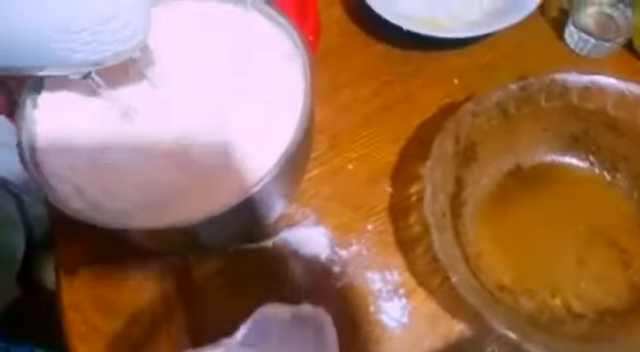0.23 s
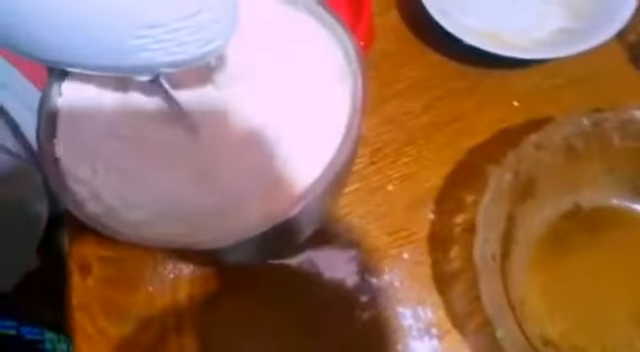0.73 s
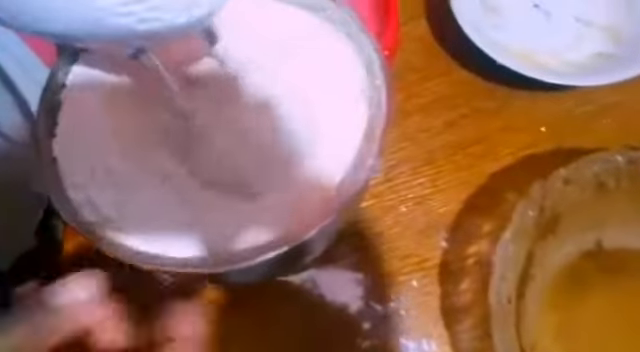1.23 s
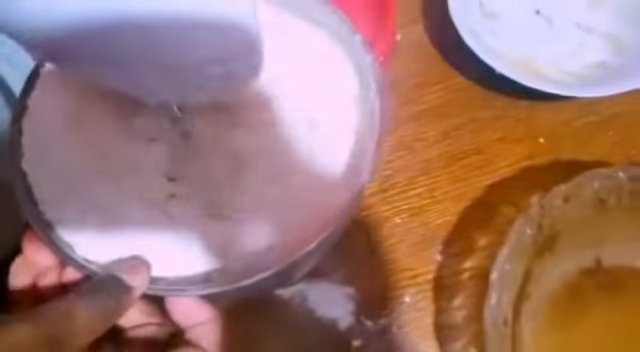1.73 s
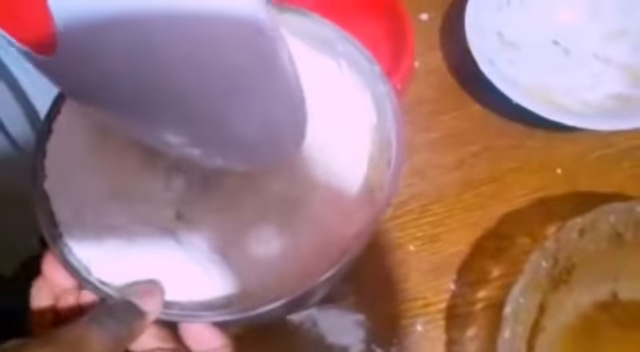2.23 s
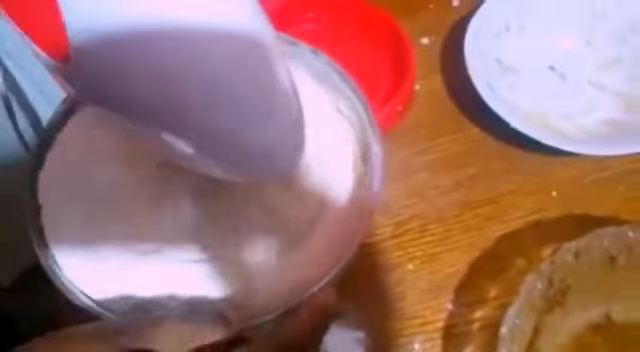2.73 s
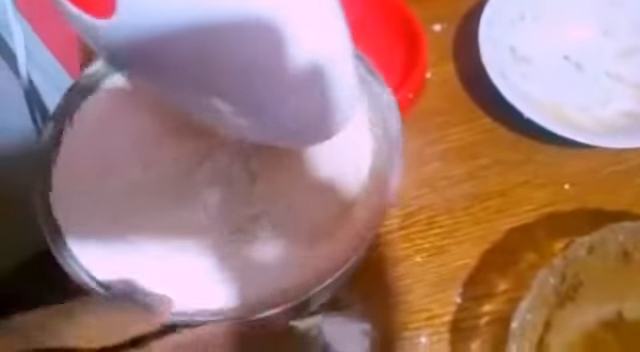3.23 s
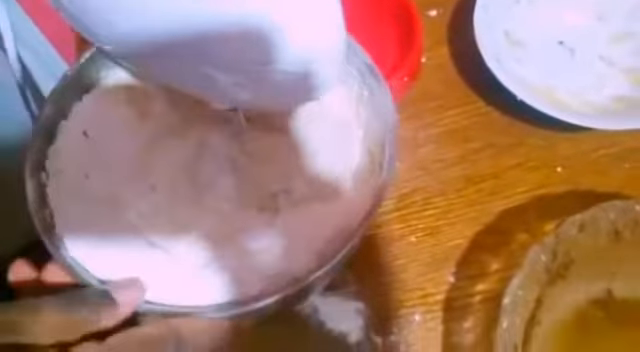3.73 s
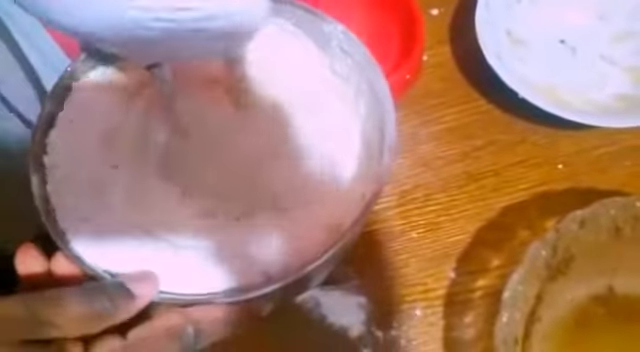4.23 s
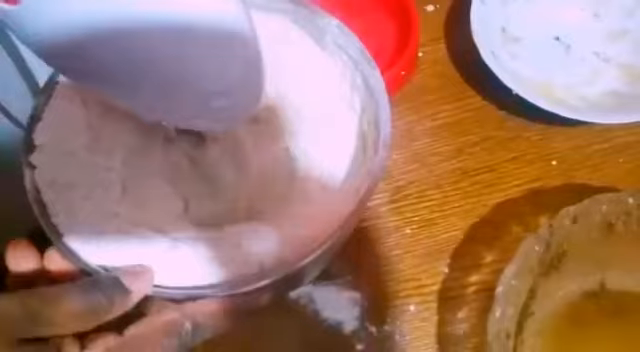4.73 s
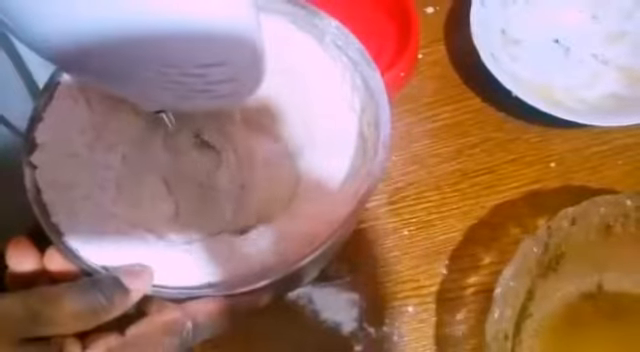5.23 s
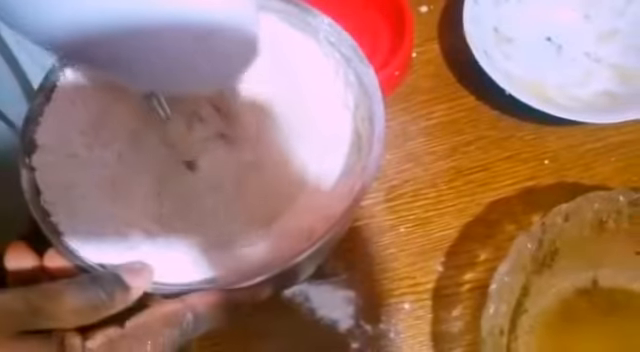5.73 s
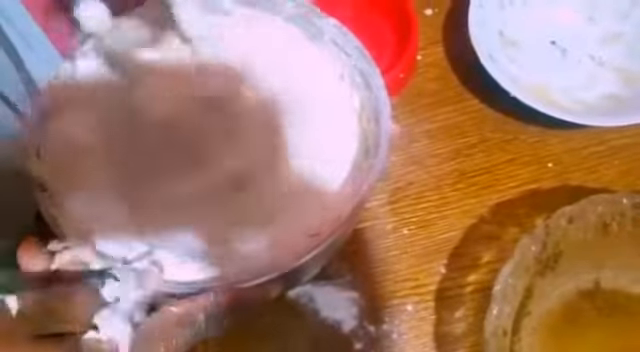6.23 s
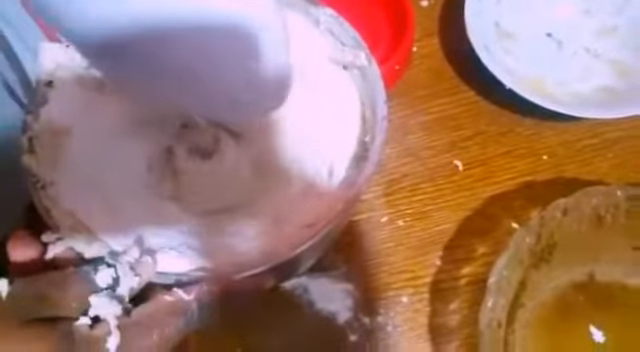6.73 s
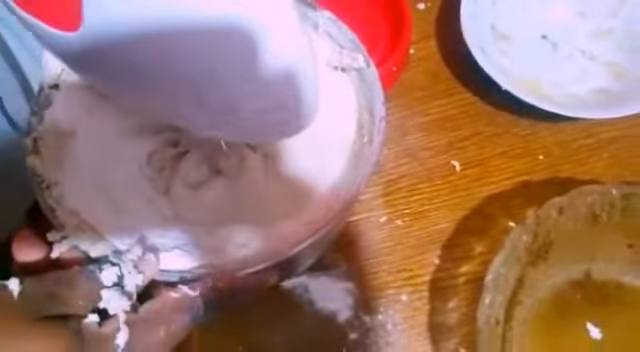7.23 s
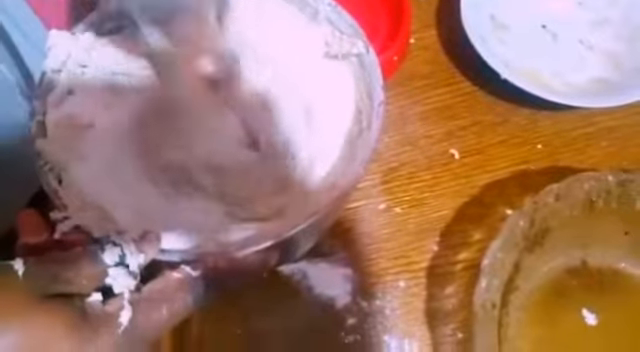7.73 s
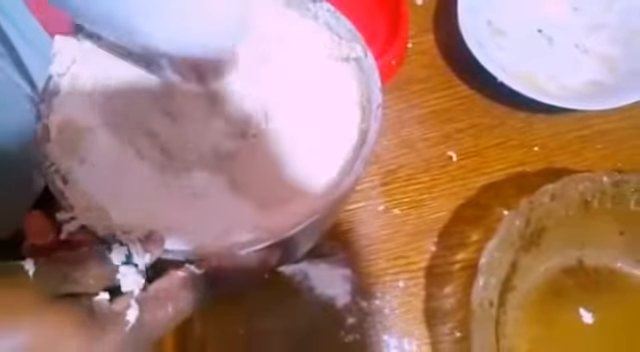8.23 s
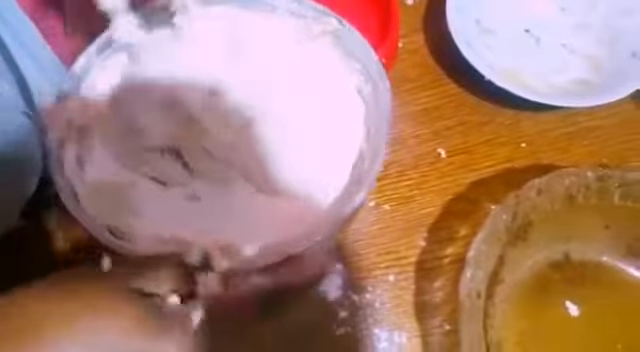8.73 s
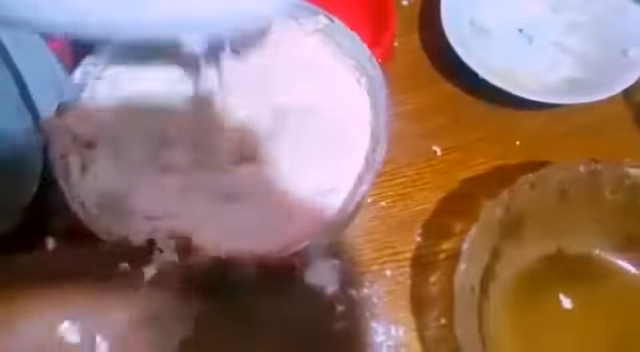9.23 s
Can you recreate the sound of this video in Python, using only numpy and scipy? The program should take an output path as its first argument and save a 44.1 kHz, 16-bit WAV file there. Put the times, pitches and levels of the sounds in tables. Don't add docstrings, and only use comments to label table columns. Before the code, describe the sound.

Close up in a kitchen, a hand mixer whirs and buzzes through stiff batter, stops with a sharp click, then beaters knock and drag in the bowl.

```python
import sys
import numpy as np
from scipy import signal
from scipy.fft import rfft, irfft
from scipy.io import wavfile
from scipy.ndimage import uniform_filter1d

SR = 44100
rng = np.random.default_rng(int(sys.argv[2]) if len(sys.argv) > 2 else 0)


def to_wav(sig):
    pcm = np.clip(np.atleast_2d(sig), -1, 1) * 32767
    pcm = np.round(pcm).astype(np.int16)
    wavfile.write(sys.argv[1], SR, pcm.T)


def nominal_scale(level):
    x = np.asarray(level, float) / 20
    return 10 ** x


N = 417627

MAINS_THROB_HZ, SLOTS, SWITCH_OFF_S = 100, 12, 7.1
# time in seconds, churning level in dB.
EFFORT = [(.19, -27), (.32, -39), (.57, -39.5), (1.08, -30), (1.35, -27.5), (1.86, -30.5), (2.6, -23.5),
          (2.9, -26), (3.4, -25), (3.75, -27.5), (4.25, -26.5), (4.42, -22), (4.79, -29), (5.04, -26),
          (5.5, -32.5), (6.3, -23), (6.73, -29), (7.0, -28.5)]
# centre in Hz, width in Hz, level in dB.
SHELL = [
    (930, 7.9, 31.5),
    (2860.8, 61.6, 33),
]


def rms_one(x):
    return x / np.sqrt(np.mean(x ** 2) + 1e-20)


def in_time(rows):
    s, *columns = np.transpose(rows)
    return [np.interp(np.arange(N) / SR, s, c) for c in columns]


def between(t0, t1, fade=0.00067):
    t = np.arange(N) / SR
    return np.clip(np.minimum(t - t0, t1 - t) / fade, 0, 1)


def at_hz(points, hz):
    point_hz, db = np.transpose(points)
    return np.interp(np.log(hz), np.log(point_hz), db)


def drift(rate):
    r = np.exp(-80 * np.pi * rate / SR)
    slow = signal.lfilter([1], [1, -2 * r, r * r], rng.standard_normal(N // 40 + 2002))[2000:]
    return np.interp(np.arange(N) / 40, np.arange(len(slow)), rms_one(slow))


def swells(rows, column=3):
    t = np.arange(0, N + 64, 64) / SR
    power = 0
    for row in rows:
        rising = (row[0] - t) / max(row[1], .003)
        falling = (t - row[0]) / max(row[2], .003)
        power = power + nominal_scale(2 * (row[column] - 20 * np.maximum(rising, falling)))
    return np.interp(np.arange(N) / SR, t, 10 * np.log10(power + 1e-12))


def ring(force, hz, t60):
    r, w = nominal_scale(-60 / (t60 * SR)), 2 * np.pi * hz / SR
    return signal.lfilter([0, np.sin(w)], [1, -2 * r * np.cos(w), r * r], force + 1e-18)


def port_noise(spectrum, patchy_db, grain_db):
    # frequency in Hz, likeness of the two ports.
    likeness = [(40, .3), (90, 1), (200, 0.99), (450, 0.41), (700, 0.93), (1200, 0.42), (3000, 0),
                (10000, 0.12)]
    # frequency in Hz, how much louder the left port is in dB.
    near_port = [(60, 2), (140, -3), (300, -1), (1000, 0), (3000, 3.5), (6000, -2.5), (12000, -5)]
    port_lag = 3.58
    hz = np.maximum(np.fft.rfftfreq(N + 1, 1 / SR), 10)
    grains = nominal_scale(grain_db * np.minimum(rng.exponential(1, N + 1), 5))
    mid, side = rfft(rng.standard_normal((2, N + 1)) * grains) * nominal_scale(at_hz(spectrum, hz))
    alike = np.clip(at_hz(likeness, hz), -1, 1)
    ports = np.sqrt(1 + alike) * mid + np.sqrt(1 - alike) * side * [[1], [-1]]
    ports = ports * nominal_scale(at_hz(near_port, hz) / 2 * [[1], [-1]])
    ports = ports * np.exp(-2j * np.pi * hz * port_lag / SR * [[0], [1]])
    return rms_one(irfft(ports, N + 1)[:, :N]) * nominal_scale(patchy_db * drift(8.3))


def at_ports(line, phase, near_db=2):
    near = line * nominal_scale(near_db / 2)
    far = line * np.exp(1j * phase) * nominal_scale(-near_db / 2)
    return np.sqrt(2) * np.real([near, far])


def room_air():
    # frequency in Hz, level in dB per Hz.
    air = [(40, -33), (75, 13.5), (110, -3), (170, 2.5), (400, -8), (2000, -24), (8000, -28.5),
           (14000, -48.5)]
    return nominal_scale(-49) * port_noise(air, patchy_db=1, grain_db=0)


def far_drone():
    # frequency in Hz, level in dB per Hz.
    colour = [(30, -22), (55, 1.5), (100, 3), (140, -50)]
    # peak time in seconds, rise in seconds, fall in seconds, level in dB.
    visits = [(2.3, .4, 0.34, -50), (3.5, 0.14, 1.5, -43), (5.25, 0.37, 0.55, -36),
              (7.0, 0.85, 0.44, -41.5), (7.85, 0.32, 0.43, -62.5), (8.9, 0.58, 1.1, -39.5),
              (9.35, 0.42, 0.45, -48)]
    return nominal_scale(swells(visits)) * port_noise(colour, patchy_db=8.5, grain_db=-12.5)


def bowl_ring(force):
    # frequency in Hz, level in dB, t60 in seconds.
    modes = [(383, -7, 0.057), (671, -2, 0.087), (753, 1, 0.06), (884, 4, 0.04), (960, -5.5, 0.058),
             (1120, -6.5, 0.048), (1302, -8.5, 0.05), (1500, -14, 0.042), (2076, -11.5, 0.052),
             (2920, -21.5, 0.042)]
    out = 0
    for hz, db, t60 in modes:
        port_db = rng.normal(0, 1.5, (2, 1))
        out = out + nominal_scale(db + port_db) * ring(force * rng.normal(1, 0.63, N), hz, t60)
    return out


def contacts():
    # time in seconds, peak in dB, bowl ring against tick in dB.
    ticks = [(0.1456, -16.5, -2), (0.273, -21.5, 4), (0.296, -24, 12), (0.314, -34, 11), (0.3636, -33, 16),
             (0.4415, -27, -4), (0.539, -32, -6), (1.513, -34, 26.5), (3.995, -30, -13), (4.6014, -31, -19),
             (5.205, -18, -5), (5.3106, -20.5, 5.5), (5.469, -20.5, 4), (5.588, -28, 21.5),
             (5.6017, -16.5, -4), (7.1248, -9.5, -22), (7.755, -63, 15.5), (7.8054, -58, 18),
             (7.8247, -64.5, 11.5), (7.843, -56, 14), (7.906, -48.5, 20), (7.955, -51.5, 21),
             (7.985, -49, 16), (8.013, -49, 15), (8.0803, -48, 21), (8.18, -52, -7), (8.236, -41.5, -6),
             (8.4252, -48, -6), (8.363, -42, 0), (8.844, -56, 15), (8.89, -63, 14), (9.058, -52, 30),
             (9.4435, -45, 11)]
    # time in seconds, peak in dB, tick against ring in dB.
    knocks = [(7.57, -28.5, -35), (7.61, -29.5, -37.5), (8.212, -38, -25), (8.283, -15.5, -27),
              (8.289, -23, -27.5), (8.292, -41, -30), (8.309, -20.5, -32), (8.325, -25, -31),
              (8.349, -27, -24), (8.358, -25, -22), (8.38, -35, -28), (8.411, -35, -28), (9.088, -17, -35),
              (9.095, -30, -37), (9.121, -18.5, -19), (9.127, -22, -26), (9.136, -30, -20),
              (9.147, -27, -22), (9.163, -26, -29), (9.183, -26, -28), (9.2, -30, -25), (9.225, -31.5, -25),
              (9.307, -52, -35), (9.319, -37, -24), (9.34, -38, -26), (9.402, -33, -30)]
    # frequency in Hz, level in dB per Hz.
    crack_colour = [(150, -15.5), (600, 0.5), (1500, -0.5), (3700, -2), (6000, -4), (10000, -14),
                    (14000, -17.5)]
    contact_s, first_touch = 0.013, 1.4
    hits = [(s, peak, peak + ring_db) for s, peak, ring_db in ticks]
    hits += [(s, peak + tick_db, peak + 9) for s, peak, tick_db in knocks]
    crack, blow = np.zeros(N), np.zeros(N)
    for s, tick_db, ring_db in hits:
        crack[round(s * SR)] = nominal_scale(tick_db + 3.5)
        blow[round(s * SR)] = nominal_scale(ring_db - 38.0)
    fade = signal.lfilter([1], [1, -nominal_scale(-60 / (.014 * SR))], crack + 1e-18)
    fade = uniform_filter1d(fade, size=61, origin=30)
    contact = signal.lfilter([1], [1, -nominal_scale(-60 / (contact_s * SR))], blow + 1e-18)
    blow = first_touch * blow + contact * rng.standard_normal(N)
    steel = nominal_scale(-10) * ring(crack, hz=3750, t60=0.01) * nominal_scale([[2], [-2]])
    return fade * port_noise(crack_colour, patchy_db=1, grain_db=0) + steel + bowl_ring(blow)


def kitchen(x, t60=0.045):
    t = np.arange(SR // 2) / SR
    tail = rng.standard_normal((2, len(t))) * nominal_scale(-60 * t / t60) * (t > .004)
    return signal.fftconvolve(x, tail / np.sqrt(np.sum(tail ** 2) / 2), axes=1)[:, :N]


def rotor_speed():
    # time in seconds, turns per second.
    allowed_speed = [(0, 206), (.8, 208), (1.01, 210.5), (1.33, 241.3), (1.56, 243.5), (1.78, 229.4),
                     (2.3, 222.8), (2.55, 223.6), (2.85, 227.5), (3.05, 226.2), (3.3, 228), (3.5, 226.6),
                     (3.66, 227.3), (4.02, 236), (4.28, 266.5), (4.44, 264), (4.65, 242.6), (5.22, 241.1),
                     (5.6, 225.2), (5.83, 222.3), (5.97, 233.5), (6.12, 243), (6.32, 262), (6.68, 230),
                     (6.9, 224.8), (7.12, 222.5)]
    spin_from_s, spin_up_s, inertia_s = .125, .155, .16
    allowed = uniform_filter1d(in_time(allowed_speed)[0], size=int(inertia_s * SR), mode="nearest")
    return allowed * np.clip(1 - np.exp((spin_from_s - np.arange(N) / SR) / spin_up_s), .13, 1)


def follower(base_db, share, power):
    usual_effort_db, usual_speed = -29, 230
    effort_db = share * (in_time(EFFORT)[0] - usual_effort_db)
    return base_db + effort_db + 20 * power * np.log10(rotor_speed() / usual_speed)


def start_surge(turn, mains):
    # time in seconds, level in dB.
    inrush = [(.147, -48), (.165, -53), (.178, -40), (.186, -40), (.193, -32.5), (.201, -22.5),
              (.212, -30.5), (.225, -35.5), (.25, -34.5), (.3, -53), (.45, -52.5), (.6, -49)]
    lag_s = .0015
    throb = 1 + .9 * np.cos(mains - 2 * np.pi * MAINS_THROB_HZ * lag_s)
    tones = sum(nominal_scale(db) * np.sin((k + 1) * SLOTS * turn) for k, db in enumerate([0, -17, -34]))
    sparks = nominal_scale(-13) * rng.standard_normal(N)
    force = nominal_scale(in_time(inrush)[0]) * (tones + sparks) * throb * between(.147, .6)
    rings = 0
    for hz, width, db in SHELL:
        rings = rings + nominal_scale(db) * 2 * np.pi * width / SR * ring(force, hz, 0.41 / width)
    return (nominal_scale(-9.0) * force + rings) * nominal_scale([[1], [-1]])


def housing(hz):
    return 1 + sum(nominal_scale(db) / (1 + 2j * (hz - centre) / width) for centre, width, db in SHELL)


def slot_tone(speed, turn, mains, near_db):
    throbs = [-3, -2, -1, -.5, 0, .5, 1, 1.5, 2, 2.5, 3]
    sidebands_db = [-36, -17.5, -3, -21.5, 1, -29, -2, -20, -12.5, -33.5, -15.5]
    vent_hz, vent_width_hz = 2802, 473
    dead_hz, dead_width_hz, dead_share = 2707, 108, 0.82
    out = 0
    for k, db in zip(throbs, sidebands_db):
        hz = SLOTS * speed + k * MAINS_THROB_HZ
        vent = 1 / (1 + (2 * (hz - vent_hz) / vent_width_hz) ** 4)
        gain = nominal_scale(db + 1.5 * drift(12) + drift(70)) * housing(hz) * vent
        dead = dead_share / (1 + (2 * (hz - dead_hz) / dead_width_hz) ** 2)
        line = gain * np.exp(1j * (SLOTS * turn + k * mains))
        out = out + at_ports(line * (1 - dead), 1.3 + .45 * drift(1.5), near_db)
        out = out + at_ports(line * dead, np.pi, 0)
    return out


def slot_overtones(turn, mains, over_db):
    # level in dB, blur in dB.
    overtones = [
        (3.5, -6.5),
        (-4.5, 1.5),
        (-5, 0.5),
        (-8.5, 3),
    ]
    throb = 1 + .55 * np.cos(mains)
    out = 0
    for k, (db, blur_db) in enumerate(overtones):
        blur = nominal_scale(blur_db) * (drift(100 + 50 * k) + 1j * drift(100 + 50 * k))
        line = (throb + blur) * np.exp(1j * (k + 2) * SLOTS * turn)
        out = out + nominal_scale(over_db + db + 1.5 * drift(2.5)) * at_ports(line, 1.2 * drift(2), near_db=6)
    return out


def rotor_orders(turn, one_db, four_db):
    orders = [3, 5, 6, 9, 11, 13, 14, 20]
    above_churn_db = [-18, -30.5, -23, -19.5, -20.5, -37.5, -27.5, -26.5]
    above_chatter_db = [-17.5, -13, -19, -25, -30, -38, -36, -37]
    # time, rise and fall in seconds, level in dB.
    racing = [
        (4.44, 0.35, 0.31, -22),
    ]
    # time, rise and fall in seconds, level in dB.
    wobble = [
        (.6, .5, 2.2, -41),
        (4.45, .6, .4, -36),
    ]
    # time in seconds, blur share.
    gear_play = [(0, .25), (3.8, .3), (4.2, .7), (7.2, .7)]
    usual_pressure_db = -40
    two_db = np.maximum(-46 + 0.35 * (one_db - usual_pressure_db), swells(wobble))
    load_db, racing_db, play = in_time(EFFORT)[0], swells(racing), in_time(gear_play)[0]
    levels = [(1, one_db), (2, two_db), (4, four_db)]
    for order, churn, chatter in zip(orders, above_churn_db, above_chatter_db):
        levels.append((order, np.maximum(load_db + churn, racing_db + chatter)))
    out = 0
    for order, db in levels:
        blur = play * min(order, 4) / 4 * (drift(22) + 1j * drift(22))
        line = (.9 + blur) * np.exp(1j * order * turn)
        out = out + nominal_scale(db + 1.5 * drift(2)) * at_ports(line, -0.31 + .4 * drift(.5))
    return out


def brush_bars(turn, mains):
    orders = np.arange(512)
    near_slot = np.cos(np.pi * orders / SLOTS) ** 4
    db = -60 - 0.25 * (orders - 34) + 8 * near_slot + rng.normal(0, 2.5, (3, 2, 512))
    lines = nominal_scale(db) * (orders > 25) * (orders < 64)
    one_turn = irfft(lines * np.exp(2j * np.pi * rng.random((3, 2, 512))), 1024) * 724
    at, wear = turn / (2 * np.pi) * 1024, 2 * drift(.8)
    bars = 0
    for k, pattern in enumerate(one_turn):
        ports = np.array([np.interp(at, np.arange(1024), w, period=1024) for w in pattern])
        bars = bars + np.sqrt(2) * np.cos(k * np.pi / 3 + wear) * ports
    return bars / np.sqrt(3) * (1 + .35 * np.cos(mains))


def motor():
    # time in seconds, shell facing the phone in dB,
    # left port louder in dB, pressure on the bowl in dB, gear case ringing in dB.
    grip = [(.45, -48, 15, -52, -54), (.8, -48.5, 16, -53, -49.5), (1.06, -54.5, 13.5, -52.5, -43.5),
            (1.3, -54, 29.5, -42.5, -37.5), (1.58, -49.5, 20, -40.5, -39.5), (2.08, -49, 6, -31, -39),
            (2.42, -42, 6, -32.5, -35.5), (3.18, -51, 22, -39.5, -34), (3.33, -61.5, 27, -44, -33),
            (3.64, -58, 10, -39, -40), (3.74, -52, 7.5, -38, -35), (4.09, -46.5, 5, -38.5, -44),
            (4.4, -39.5, 5, -29, -64), (4.6, -41, 8, -36.5, -47.5), (4.91, -52, 26, -36, -45),
            (5.4, -49.5, 14.5, -40, -43), (5.65, -60.5, 37, -36.5, -41.5), (5.86, -54, 15, -44, -40),
            (5.93, -45.5, 12, -42, -49), (5.99, -50.5, 14, -48, -61), (6.03, -49, 15, -37.5, -65),
            (6.07, -59.5, 17, -49.5, -60), (6.14, -55, 25.5, -38.5, -62), (6.3, -48, -12, -34, -72),
            (6.47, -41, -11, -34.5, -55), (6.55, -49, 5, -40.5, -50), (6.6, -45, 6.5, -35, -37),
            (6.65, -52, 8, -34, -44), (6.72, -46.5, 5, -35.5, -38), (7.1, -48.5, 12.5, -29.5, -43)]
    # time in seconds, level in dB.
    open_side = [(.5, 2.5), (.62, 5), (.9, 0), (1.1, 0.5), (2, 0), (2.6, 1.5), (3.9, 1), (4.4, 0.5),
                 (4.75, 3), (5.25, 1), (5.7, -3.5), (6.05, -1.5), (6.35, 0.5), (6.7, -3.5), (7.1, 1.5)]
    speed = rotor_speed()
    turn = 2 * np.pi * np.cumsum(speed) / SR
    mains = 2 * np.pi * MAINS_THROB_HZ * np.arange(N) / SR
    slot_db, near_db, one_db, four_db = in_time(grip)
    over_db = follower(-52.5, share=0.95, power=-0.93) + in_time(open_side)[0]
    running = nominal_scale(slot_db - 4.0) * slot_tone(speed, turn, mains, near_db)
    running += slot_overtones(turn, mains, over_db)
    running += rotor_orders(turn, one_db, four_db)
    running += nominal_scale(over_db + 49) * brush_bars(turn, mains)
    return running * between(.43, 7.124, fade=.008) + start_surge(turn, mains)


def churning(since_off):
    # frequency in Hz, level in dB per Hz.
    colour = [(250, -6.5), (400, -1), (520, -10), (700, 0), (900, -3), (1150, -10.5), (2000, -6),
              (3500, -26)]
    churn_db = in_time(EFFORT)[0] - 65 * since_off
    return nominal_scale(churn_db - 4.5) * port_noise(colour, patchy_db=1.13, grain_db=2.0)


def fan_air(since_off):
    # frequency in Hz, level in dB per Hz.
    colour = [(1500, -30), (2400, 8.5), (3000, 6.5), (3800, 6.5), (5000, 5.5), (7000, -3), (9500, -2),
              (11300, -6), (12700, -22.5), (14000, -10.5)]
    # time, rise and fall in seconds, level in dB.
    sparking = [
        (.3, 0.37, 0.28, -37),
    ]
    fan_db = np.maximum(follower(-39.5, share=1, power=0.77) - 65 * since_off, swells(sparking))
    mains = 2 * np.pi * MAINS_THROB_HZ * np.arange(N) / SR
    throb = 1 + .25 * np.cos(mains - .5) * between(.147, 7.122)
    return nominal_scale(fan_db + 1.0) * throb * port_noise(colour, patchy_db=2.06, grain_db=0.5)


def shaken_bowl(since_off):
    # frequency in Hz, level in dB per Hz.
    colour = [(30, -50), (50, -6.5), (75, -13.5), (170, 6), (250, -0.5), (400, -2), (600, -15.5),
              (900, -50.5)]
    # time, rise and fall in seconds, level in dB.
    bumps = [(.17, 0.055, 0.48, -40.5), (1.5, 0.15, 0.84, -37), (2.35, 0.34, 0.55, -36),
             (3.35, 0.18, 0.55, -31.5), (3.55, 0.63, 0.41, -27.5), (3.98, 0.32, 0.34, -30.5),
             (4.62, 0.53, .6, -35.5), (5.15, 1, 0.5, -31.5), (6.18, 1, 0.51, -38),
             (6.93, 0.16, 0.18, -24.5), (7.0, 0.6, 0.23, -36)]
    shake_db = np.maximum(swells(bumps), -56 - 45 * since_off)
    return nominal_scale(shake_db - 1.0) * port_noise(colour, patchy_db=3, grain_db=3)


def starting_jolt():
    # time in seconds, level in dB.
    jolt = [(.285, -30), (.297, -15), (.32, -15), (.36, -22), (.397, -22.5), (.41, -32), (.43, -49)]
    colour = [(40, 4.0), (110, 0.5), (400, -1.5), (900, -14.5), (2000, -20.5), (5000, -54.0)]  # Hz, dB per Hz
    return nominal_scale(in_time(jolt)[0]) * between(.28, .44) * port_noise(colour, patchy_db=-1.0, grain_db=2.5)


def rush():
    since_off = np.maximum(np.arange(N) / SR - SWITCH_OFF_S, 0)
    noise = churning(since_off) + fan_air(since_off) + shaken_bowl(since_off)
    return noise * between(.147, 7.75) + starting_jolt()


def slaps():
    # time in seconds, peak in dB.
    wire_hits = [(0.295, -32), (0.315, -25), (0.344, -15.5), (3.258, -19), (3.294, -19), (3.334, -19),
                 (3.377, -11.5), (3.414, -12.5), (3.454, -13), (3.499, -19.5), (3.542, -13), (3.589, -16.5),
                 (3.634, -12.5), (3.892, -20), (3.933, -21), (3.969, -22), (6.903, -15), (6.949, -27),
                 (6.984, -23)]
    # frequency in Hz, level in dB, t60 in seconds.
    wall_modes = [(338, -9, 0.012), (470, 4.5, 0.009), (607, 3.5, 0.016), (770, -1, 0.011)]
    out = 0
    s, db = np.transpose(wire_hits)
    for hz, level_db, t60 in wall_modes:
        force = np.zeros(N)
        force[(s * SR).astype(int)] = nominal_scale(db + level_db - 11 + rng.normal(0, 3, len(s)))
        out = out + ring(force, hz, t60)
    return out * nominal_scale([[2], [-2]])


def bowl_moves():
    # time, rise and fall in seconds, rumble in dB, wall in dB.
    shifts = [(7.45, .1, .2, -63, -50), (7.57, 0.034, .08, -43.5, -57.5), (7.95, 0.055, 0.49, -41.5, -62),
              (8.02, 0.074, 0.011, -36, -42), (8.21, 0.0074, 0.14, -42, -47),
              (8.3, 0.044, 0.16, -58, -27.5), (8.47, 0.21, 0.12, -40, -44),
              (8.69, 0.49, 0.15, -41.5, -45.5), (8.9, 0.14, 1, -32.5, -43),
              (9.13, 0.061, 0.19, -31.5, -21.5), (9.4, 0.19, 0.23, -23, -36)]
    # time, rise and fall in seconds, level in dB.
    strokes = [
        (7.57, 0.27, 0.094, -56.5),
        (8.21, 0.0045, 0.18, -50.5),
        (8.69, 0.28, 0.21, -46),
        (9.47, 0.22, .2, -54),
    ]
    # frequency in Hz, level in dB per Hz.
    rumble_colour = [(35, 1.5), (70, -40.5), (170, 12), (250, -5.5), (400, -3.5), (600, -13.5), (900, -71)]
    # frequency in Hz, level in dB per Hz.
    drag_colour = [(900, 3), (1600, 7), (3200, 0), (4500, -3.5), (7000, -10.5), (10000, -20), (14500, -47)]
    rumble_db, wall_db = swells(shifts), swells(shifts, column=4)
    drag_gain = np.hypot(nominal_scale(wall_db - 16), nominal_scale(swells(strokes)))
    slips = (rng.random(N) < 900 / SR) * rng.standard_normal(N)
    rumble = nominal_scale(rumble_db + 3) * port_noise(rumble_colour, patchy_db=1.5, grain_db=3)
    wall = nominal_scale(wall_db - 9) * rms_one(bowl_ring(slips))
    drag = nominal_scale(2.0) * drag_gain * port_noise(drag_colour, patchy_db=-4.0, grain_db=2.0)
    return (rumble + wall + drag) * between(7.48, 9.6, fade=0.037)


def scene():
    hits = contacts() + slaps()
    room = room_air() + far_drone() + nominal_scale(-8.5) * kitchen(hits)
    return room + hits + motor() + rush() + bowl_moves()


def band_limit(x):
    return signal.sosfilt(signal.butter(12, 14420, fs=SR, output="sos"), x)


def record(dry):
    lag, share, dull_hz = 19.6, .97, 5000
    hz = np.fft.rfftfreq(N + 101, 1 / SR)
    passed = np.array([1 / (1 + (hz / dull_hz) ** 6), np.ones_like(hz)])
    late = rfft(dry[::-1], N + 101) * passed * np.exp(-2j * np.pi * hz * lag / SR)
    wide = dry - share * irfft(late, N + 101)[:, :N]
    hiss_band = signal.butter(2, 8000, "high", fs=SR, output="sos")
    wide += nominal_scale(-63.5) * signal.sosfilt(hiss_band, rng.standard_normal((2, N)))
    wide = wide / (1 + np.abs(wide / .95) ** 6) ** (1 / 6)
    wide = signal.sosfilt(signal.butter(2, 28, "high", fs=SR, output="sos"), wide)
    cut = signal.sosfilt(signal.cheby2(14, 60, 14950, fs=SR, output="sos"), wide)
    return band_limit(cut)


dry = scene()
out = record(dry)
to_wav(out)
```